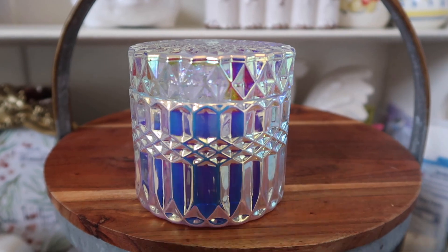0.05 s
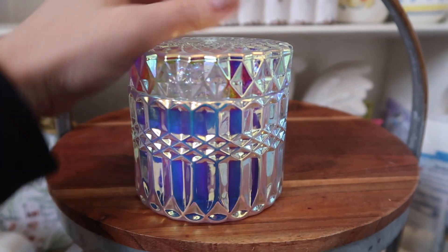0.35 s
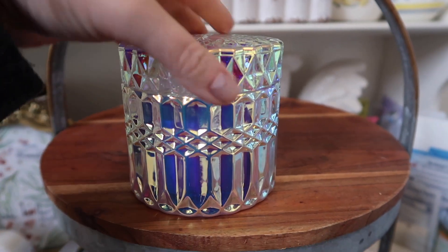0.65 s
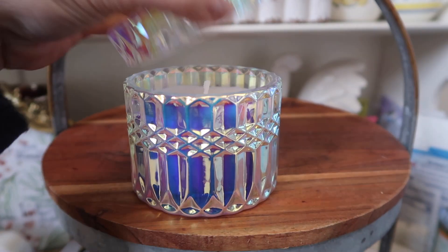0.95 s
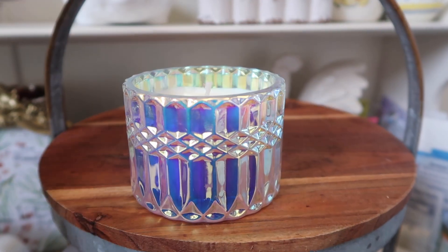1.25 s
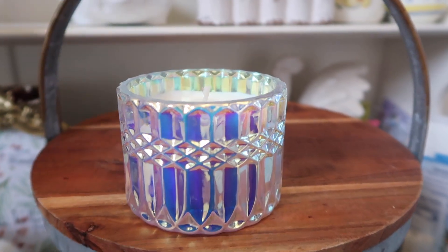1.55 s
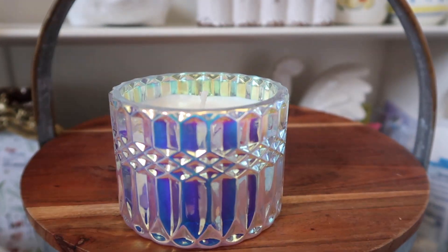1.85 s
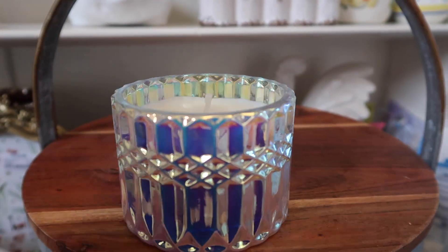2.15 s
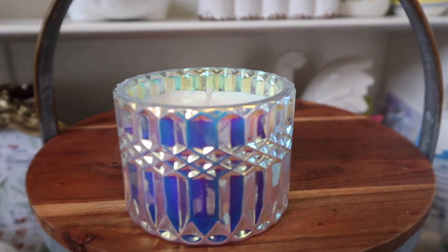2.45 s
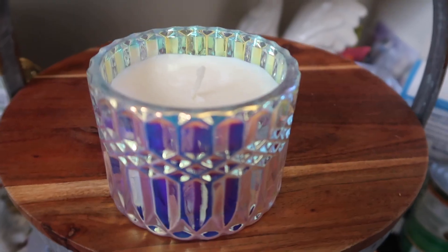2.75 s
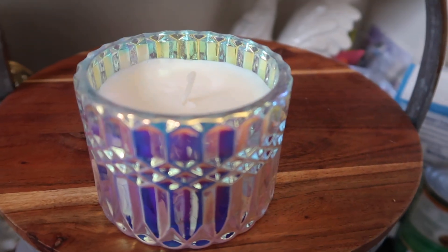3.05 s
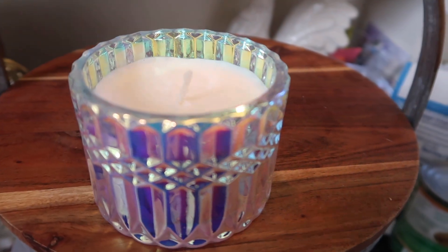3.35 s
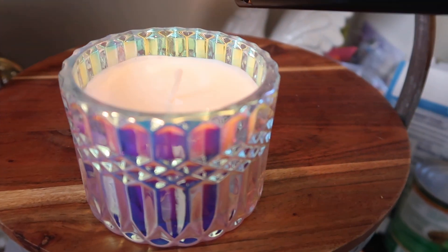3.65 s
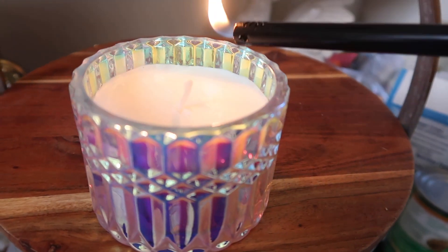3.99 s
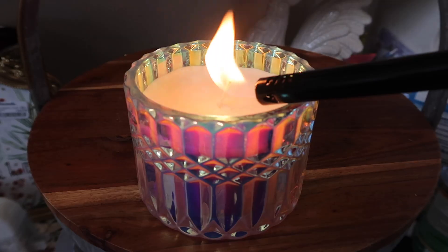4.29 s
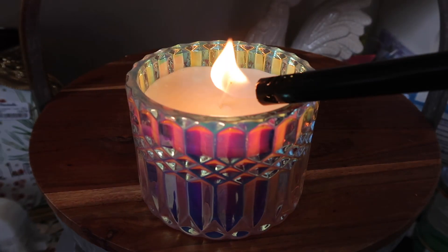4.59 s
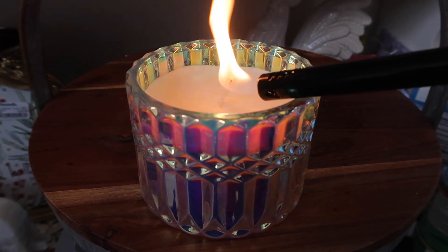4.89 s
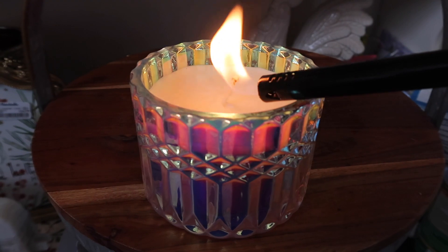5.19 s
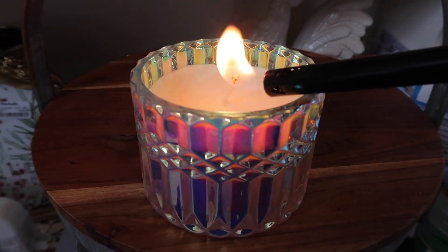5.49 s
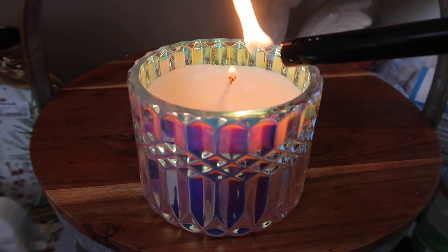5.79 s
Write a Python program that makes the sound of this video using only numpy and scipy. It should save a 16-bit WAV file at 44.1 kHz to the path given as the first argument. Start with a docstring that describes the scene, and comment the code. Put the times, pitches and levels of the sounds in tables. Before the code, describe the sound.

A glass lid clinks off a candle jar and knocks onto wood, then a camera mount snaps loudly and a lighter clicks.

```python
"""A glass lid clinks off a candle jar on a wooden tray, then rocks onto wood in three knocks.
Heard close by in a small, quiet room, on a hand-held camera's stereo microphones. The camera is tilted:
its mount ticks, then snaps and jolts the capsules into overload. A sleeve rustles; a long lighter clicks,
its gas hisses faintly and its flame flutters. Gain control ducks the room tone after the loud blows."""
import sys
import numpy as np
from scipy import signal
from scipy.fft import rfft, irfft, next_fast_len
from scipy.io import wavfile
from scipy.ndimage import uniform_filter1d, minimum_filter1d

SR = 44100
rng = np.random.default_rng(int(sys.argv[2]) if len(sys.argv) > 2 else 0)


def dump_mix(stems):
    """Bounce the given channels to the path in sys.argv[1] as a 16-bit WAV at rate SR."""
    frames = np.atleast_2d(stems).T  # one column per channel
    limited = np.clip(frames, -1, 1)  # hard clip at full scale
    pcm = np.round(limited * 32767).astype(np.int16)
    wavfile.write(sys.argv[1], SR, pcm)


N = 266011
T = np.arange(SR // 2) / SR  # seconds since a blow

# Lid on jar. Each row: start in seconds, blow in dB, treble corner in Hz, glass ring in dB,
# seconds until the rim is touched again.
CLINKS = [(0.3731, -25.5, 1040, -41, .02), (.731, -21.5, 6000, -19, 0.016), (.751, -14, 4560, -4, 0.0092),
          (0.7696, -17.5, 3500, -10, 0.012), (0.8212, -20, 5000, -3, .003), (.824, -10, 4470, -7.5, 0.028),
          (.904, -32.5, 1000, -18, .02)]
# Lid on wood. Each row: start in seconds, blow in dB, treble corner in Hz, direct thud in dB.
KNOCKS = [(1.7489, -5, 1436, 3), (1.8408, -3.5, 1500, 3), (1.939, 2, 4446, -4.5)]
# Small clicks. Each row: start in seconds, level in dB, treble corner in Hz.
MOUNT_TICKS = [(2.626, -21.5, 4000), (2.741, -29, 7000), (2.822, -26.5, 4000)]
TRIGGER_SNAPS = [(4.0546, -25.5, 13250), (4.0564, -26, 2930)]
# The mount slips. Each row: start in seconds, capsule shake in dB, rasp in dB, rasp t60 in seconds.
MOUNT_SLIPS = [(2.9373, -18.5, -47.5, .01), (2.9476, -5.5, -12.5, 0.12), (2.9523, -3.5, 3, 0.013),
               (2.965, -39, -17.5, 0.043)]
# The wick catches. Each row: start in seconds, level in dB.
WICK_SPITS = [(5.7709, -39)]
# Movements. Each row: start in seconds, length in seconds, level in dB.
ARM_MOVES = [(-.05, .9, -53.5), (1.33, 0.55, -49), (3.391, 0.63, -56.5)]
FINGER_SLIDES = [(2.403, 0.028, -50.5), (2.459, 0.07, -50), (2.576, 0.075, -52.5), (2.666, 0.36, -58.5)]

# Ringing parts. Each row: frequency in Hz, relative level in dB, t60 in seconds.
TRAY_MODES = [(135, -15, 0.15), (247.3, -10, .1), (462.6, -8, 0.19), (508, -10, 0.13), (595, -7, 0.21),
              (698, -11, 0.098), (893.5, -4, 0.12), (1025, -8, 0.044), (1424, -5, 0.071), (1960, -4, 0.029),
              (2410, -5.5, 0.018), (2780, -8.5, 0.052), (3000, -5, 0.025), (3410, -9.5, 0.026)]  # with the jar standing on it
GLASS_MODES = [(6040, -11.5, 0.21), (6070, -24, 0.087), (6700, -16, 0.024), (10050, -36.5, .09),
               (15000, -44, 0.057)]
BOARD_MODES = [(741, -4, 0.088), (820, -1, 0.046), (907, -5.5, .04), (1025, -5, .04), (1170, -7.5, 0.035),
               (1434, -14.5, .06), (1753, -15, .06), (2132, -21, 0.027), (2540, -13.5, .045),
               (2770, -16.5, 0.017), (3025, -17.5, .05)]
BENDING_MODES = [(129.2, -13.5, 0.18), (186, -11.5, 0.098), (268, -6.5, 0.087), (328, -16.5, 0.087),
                 (437, -15, 0.11)]  # the board's slow flexing
MOUNT_MODES = [(5800, -31, .1), (10700, -25.5, .08), (12200, -24.5, .08), (15550, -24, .11)]
LIGHTER_MODES = [(579, -16, 0.1), (1409, -14, 0.072), (1780, -8, 0.065), (2550, 0.5, 0.015),
                 (3480, -11, 0.031), (7770, -23, .06), (9050, -11, 0.021), (10300, -22.5, 0.021)]

# Noise spectra. Each row: frequency in Hz, relative level in dB.
CLINK_CRACK = [(100, -7), (300, 1), (600, 9.5), (1500, -8), (3000, -4.5), (4500, -19.5), (7000, -17.5),
               (10000, -31), (16000, -36.5)]
KNOCK_CRACK = [(70, -31.5), (200, 0), (1000, 0.5), (2000, -7), (3500, -14), (5000, -22.5), (8000, -36),
               (16000, -48.5)]
MOUNT_CRACK = [(150, -11.5), (450, 3.5), (900, -4), (1400, 1), (2500, 2), (4200, -7.5), (6000, -17.5),
               (12000, -11.5), (16000, -25.5)]
MOUNT_RASP = [(200, -0.5), (500, 0.5), (1000, -9), (2500, 1.5), (4200, 3.5), (6500, 1), (9000, 0.5),
              (13000, 2), (16000, -16)]
LIGHTER_CRACK = [(150, 5.5), (600, 8.5), (1200, 2.5), (2500, 8), (4000, -6), (6000, -13), (9000, 0),
                 (14000, -16), (16000, -33)]
WICK_CRACK = [(300, -18.5), (1300, 0), (2000, 4), (3000, 0), (4100, 3), (5500, -6.5), (8000, -14),
              (15000, -31.5)]
GAS_JET = [(300, -13), (1200, -0.5), (4000, -17), (6500, -15), (8400, 5), (11000, -8), (13300, 4),
           (16000, -32)]
FLAME_FLUTTER = [(20, -20), (45, -5), (70, 4.5), (120, -8.5), (200, -18), (330, -18), (700, -33),
                 (2000, -61)]
CLOTH_RUB = [(200, -2), (400, 7), (800, 1.5), (1400, -8), (2200, 3.5), (3000, -8), (4600, -11),
             (8000, -28.5), (13000, -27), (16000, -47.5)]
SKIN_RUB = [(100, 6), (400, 4), (1000, -2), (2300, -1.5), (5000, 1.5), (10000, -6.5), (13000, -15.5),
            (16000, -36)]
HAND_RUMBLE = [(15, -7), (35, -9), (60, 2.5), (110, -3), (180, -13.5), (300, -7), (600, -25.5), (1500, -53)]
ROOM_TONE = [(20, -19), (45, -15), (70, -7), (105, -15), (180, -18.5), (300, -13), (450, -19.5),
             (620, -23.5), (1000, -24), (2200, -28), (3800, -32.5), (8400, -41), (13000, -48.5),
             (15500, -59)]

# Colour of the reflections. Each row: frequency in Hz, relative gain in dB.
ROOM_GAIN = [(50, -17.5), (130, -2), (400, -0.5), (1000, -0.5), (2200, -4), (5000, -4.5), (12000, 1.5),
             (16000, -17.5)]
# Their decay. Each row: frequency in Hz, t60 in seconds.
ROOM_T60 = [(100, 0.87), (300, 0.64), (800, .52), (2000, .58), (4000, .45), (8000, 0.17), (16000, .22)]

# Stereo image at the microphones. Each row: frequency in Hz, left-right likeness from -1 to 1.
BLOW_IMAGE = [(300, 0.98), (1000, 1), (3000, 0.67), (5000, .6), (9000, .1), (16000, 0.45)]
BODY_IMAGE = [(150, .9), (500, .7), (1200, 0.03), (2500, -0.016), (4500, -0.46), (8000, -.55), (13000, -.8)]  # sound through the camera body
ROOM_IMAGE = [(200, 1), (330, 1), (500, 0.62), (1500, 0.71), (4000, .1)]
DIFFUSE_IMAGE = [(30, 1), (150, .9), (350, 0.69), (600, .1), (2000, 0), (16000, 0)]


def lid_lifted():
    """The lid chatters on the rim: the glass pings until touched again; the tray clacks under the jar."""
    out = np.zeros((2, N))
    for s, db, hard_hz, glass_db, free_s in CLINKS:
        tray = amp(-8) * ring(TRAY_MODES, rise=.0004)
        contact = crack(CLINK_CRACK, BLOW_IMAGE, t60=.0096, after_db=-10.5, after_t60=.13, rise=.00032)
        clack = soften(tray + amp(-1) * contact, hard_hz)
        damping = amp(-15 * np.clip((T - free_s) / .0039, 0, 1))
        ping = amp(glass_db) * damping * ring(GLASS_MODES, rise=.00075)
        add(out, s, amp(db) * (clack + ping * amp([[-2], [1]])))  # the ping sits slightly right
    return out + room(out, wet_db=-17.5)


def lid_set_down():
    """Each knock rings the board, whose bending swells just after; the broad clap fills the room."""
    direct, to_room = np.zeros((2, N)), np.zeros((2, N))
    for s, db, hard_hz, thud_db in KNOCKS:
        contact = crack(KNOCK_CRACK, BLOW_IMAGE, t60=.023, after_db=-9, after_t60=.18, rise=.00099)
        clap = amp(-6.5) * soften(contact, hard_hz) + amp(-13.5) * contact
        board = amp(1.5) * soften(ring(BOARD_MODES, rise=.0036), hard_hz)
        thud = amp(db) * ring(BENDING_MODES, rise=.003)
        add(direct, s, amp(db) * (clap + board))
        add(direct, s + .005, amp(thud_db) * thud)
        add(to_room, s, amp(db) * (clap + amp(-7) * board))
        add(to_room, s + .005, thud)
    low_cut = signal.butter(4, 90, "high", fs=SR, output="sos")
    return signal.sosfilt(low_cut, direct + room(to_room, wet_db=-13))


def mount_snap(jolt_s=2.953, rebound_s=3.017, shake_hz=470, shake_t60=.2, lag_s=.0004):
    """The mount rasps and rocks the capsules against each other, then stops with a jolt and rebounds."""
    rasp, shake = np.zeros((2, N)), np.zeros((2, N))
    rocking = np.sin(2 * np.pi * shake_hz * T + np.array([[0], [2.3]]))
    for s, shake_db, rasp_db, t60 in MOUNT_SLIPS:
        fade = amp(-60 * T / t60) * (1 - np.exp(-T / .0019))
        add(rasp, s, amp(rasp_db) * fade * noise(MOUNT_RASP, [(100, 0), (5000, -.4)], size=len(T)))
        until_jolt = np.exp(-np.maximum(s + T - jolt_s, 0) / .0018)
        add(shake, s, amp(shake_db - 60 * T / shake_t60) * until_jolt * rocking)
    add(rasp, jolt_s, ring(MOUNT_MODES, rise=.0005) * [[-.3], [1]])  # metal parts ring
    jolt = swing(db=14.5, time=.0026)
    add(shake, jolt_s - lag_s, amp(-.5) * jolt * [[1], [0]])  # the left capsule is reached first
    add(shake, jolt_s + lag_s, jolt * [[0], [1]])
    add(shake, rebound_s, soften(swing(db=-17, time=.0024), hz=160))
    return rasp + soften(room(rasp, wet_db=-17.5), hz=10000) + soften(shake, hz=2000)


def mount_ticks():
    """The tilting mount ticks, reaching the microphones through the camera body."""
    out = np.zeros((2, N))
    for s, db, hard_hz in MOUNT_TICKS:
        tick = crack(MOUNT_CRACK, BODY_IMAGE, t60=.027, after_db=-16.5, after_t60=.082, rise=.001)
        add(out, s, amp(db) * soften(tick, hard_hz))
    return out + room(out, wet_db=-17.5)


def lighter(gas_s=3, gas_rise_s=.352, gas_db=-75.5):
    """Gas hisses from the nozzle, the trigger snaps in its plastic case, and the wick spits once."""
    out = np.zeros((2, N))
    for s, db, hard_hz in TRIGGER_SNAPS:
        snap = crack(LIGHTER_CRACK, BLOW_IMAGE, t60=.011, after_db=-15, after_t60=.096, rise=.00012)
        case = ring(LIGHTER_MODES, rise=.00075)
        add(out, s, amp(db) * soften(case + amp(-1) * snap, hard_hz))
    for s, db in WICK_SPITS:
        spit = crack(WICK_CRACK, BLOW_IMAGE, t60=.021, after_db=-17.5, after_t60=.062, rise=.00045)
        add(out, s, amp(db) * spit)
    flow = np.clip((np.arange(N) / SR - gas_s) / gas_rise_s, 0, 1)
    hiss = amp(gas_db) * flow * noise(GAS_JET, DIFFUSE_IMAGE)
    return out + soften(room(out, wet_db=-13.5), hz=1900) + hiss


def flame(start_s=4.2, rise_s=.16, db=-54):
    """The flame flutters softly once it stands over the wick."""
    burning = np.clip((np.arange(N) / SR - start_s) / rise_s, 0, 1)
    return amp(db) * burning * noise(FLAME_FLUTTER, DIFFUSE_IMAGE)


def handling(held_db=-46, settle_db_per_s=-2, let_go_s=3.05, fall_s=.078):
    """The held camera rumbles less and less until let go; fingers shift their grip in short slides."""
    t = np.arange(N) / SR
    held = amp(held_db + settle_db_per_s * t) * np.exp(-np.maximum(t - let_go_s, 0) / fall_s)
    slides = sum(amp(db) * swell(s, length, rise=.028, fall=.02) for s, length, db in FINGER_SLIDES)
    return held * noise(HAND_RUMBLE, DIFFUSE_IMAGE) + slides * rubbing(SKIN_RUB, BODY_IMAGE, grain_db=4)


def sleeve():
    """The sleeve rustles as the arm reaches for the lid, lowers it and brings the lighter."""
    speed = sum(amp(db) * swell(s, length, rise=.28, fall=.17) for s, length, db in ARM_MOVES)
    image = [(300, .7), (1300, .18), (2200, .77), (3500, .26)]
    return speed * rubbing(CLOTH_RUB, image, grain_db=1.1)


def room(x, wet_db):
    """The reflections of a small room, each band dying at its own speed."""
    taps = pair(rng.standard_normal((2, SR)), ROOM_IMAGE)
    hz, t, bands = signal.stft(taps, SR, nperseg=256)
    bands = bands * amp(curve(ROOM_GAIN, hz)[:, None] - 60 * t / curve(ROOM_T60, hz)[:, None])
    tail = signal.istft(bands, SR, nperseg=256)[1]
    tail *= np.clip(np.arange(tail.shape[1]) / SR / .014, 0, 1) ** 2  # reflections build up
    return amp(wet_db) * signal.fftconvolve(x[:1], tail / np.linalg.norm(tail[0]), axes=1)[:, :N]


def ring(modes, rise):
    """Dying modes of alternating sign; each contact spot weights them a little differently."""
    spot_db = 1.5 * rng.standard_normal(len(modes))
    tones = [(-1) ** k * amp(db + spot_db[k] - 60 * T / t60) * np.sin(2 * np.pi * hz * T)
             for k, (hz, db, t60) in enumerate(modes)]
    return sum(tones) * (1 - np.exp(-T / rise))


def crack(spectrum, image, t60, after_db, after_t60, rise):
    """Crowded damped modes: a sharp burst and a weaker after-ring."""
    fade = amp(-60 * T / t60) + amp(after_db - 60 * T / after_t60)
    return noise(spectrum, image, size=len(T)) * fade * (1 - np.exp(-(T / rise) ** 2))


def soften(x, hz):
    """Rolls off the treble, as a longer contact does to a blow."""
    return signal.sosfilt(signal.butter(2, min(hz, .45 * SR), fs=SR, output="sos"), x)


def swing(db, time):
    """A push on the microphone body that swings back twice."""
    u = T / time
    return -amp(db) * (1 - 2 * u + u ** 2 / 2) * np.exp(-u)


def rubbing(spectrum, image, grain_db):
    """Friction noise that flutters as the surfaces catch."""
    catch = uniform_filter1d(rng.standard_normal(N), size=600)
    return noise(spectrum, image) * amp(grain_db * catch / catch.std())


def swell(start, length, rise, fall):
    """A movement: straight rise, hold, exponential release; times in seconds."""
    t = np.arange(N) / SR - start
    return np.clip(t / rise, 0, 1) * np.exp(-np.maximum(t - length, 0) / fall)


def noise(spectrum, image, size=N):
    """Coloured stereo noise of rms about 1."""
    n = next_fast_len(size)
    colour = amp(curve(spectrum, np.fft.rfftfreq(n, 1 / SR)))
    x = irfft(rfft(rng.standard_normal((2, n))) * colour, n)
    return pair(x, image)[:, :size] / x.std()


def pair(x, image):
    """Makes two unrelated channels alike by a frequency-dependent share."""
    z = rfft(x)
    likeness = np.clip(curve(image, np.fft.rfftfreq(x.shape[1], 1 / SR)), -1, 1)
    mid, side = np.sqrt((1 + likeness) / 2) * z[0], np.sqrt((1 - likeness) / 2) * z[1]
    return irfft(np.array([mid + side, mid - side]), x.shape[1])


def curve(points, hz):
    """Joins points by straight lines on a log frequency axis."""
    f, value = np.transpose(points)
    return np.interp(np.log(hz + 1), np.log(f + 1), value)


def add(mix, s, sound):
    """Lays a sound into both channels at s seconds."""
    part = mix[:, round(s * SR):][:, :sound.shape[-1]]
    part += sound[..., :part.shape[1]]


def amp(db):
    return 10 ** (np.asarray(db) / 20)


def scene():
    """All that reaches the microphones, over steady room tone."""
    room_tone = amp(-52.5) * noise(ROOM_TONE, DIFFUSE_IMAGE)
    lid = lid_lifted() + lid_set_down()
    mount = mount_ticks() + mount_snap()
    return lid + mount + sleeve() + handling() + lighter() + flame() + room_tone


def record(dry, threshold_db=-11, hold_s=.46, recovery_db_per_s=16, attack_s=.015, share=.64):
    """Gain control drops quickly, waits and creeps back; what slips past clips; then the band limit."""
    power_db = 10 * np.log10(abs(uniform_filter1d((dry ** 2).mean(0), size=200)) + 1e-12)
    half = int(hold_s * SR / 2)
    held_db = -minimum_filter1d(-power_db, 2 * half + 1, origin=half, mode="nearest")
    recovery_db = np.arange(N) / SR * recovery_db_per_s
    level_db = np.maximum.accumulate(held_db + recovery_db) - recovery_db
    over_db = np.maximum(level_db - threshold_db, 0)
    pole = np.exp(-1 / (attack_s * SR))
    ducked = dry / amp(share * signal.lfilter([1 - pole], [1, -pole], over_db))
    clipped = ducked / (1 + ducked ** 8) ** (1 / 8)
    band_limit = signal.firwin(255, cutoff=15900, window=("kaiser", 8), fs=SR)
    return signal.oaconvolve(clipped, band_limit[None], "same")


dry = scene()
out = record(dry)
dump_mix(out)
```